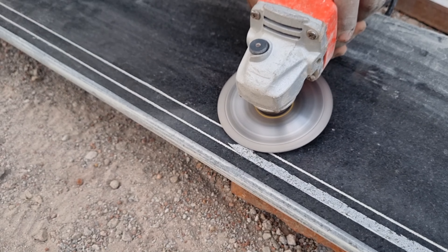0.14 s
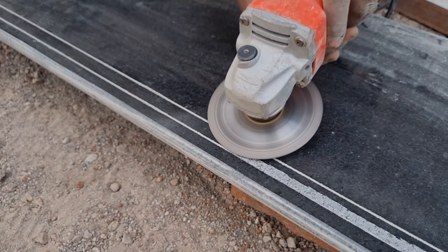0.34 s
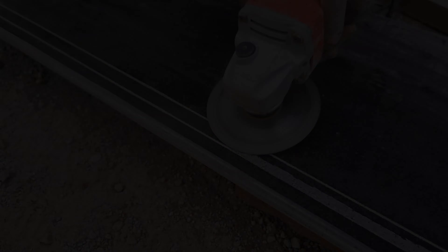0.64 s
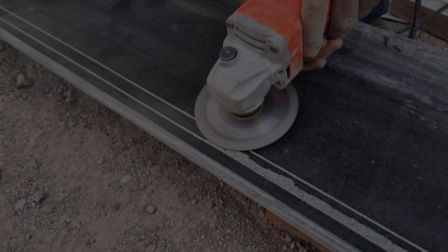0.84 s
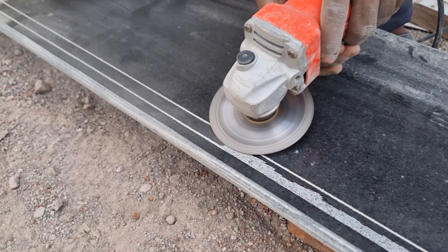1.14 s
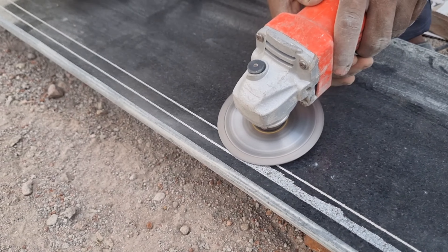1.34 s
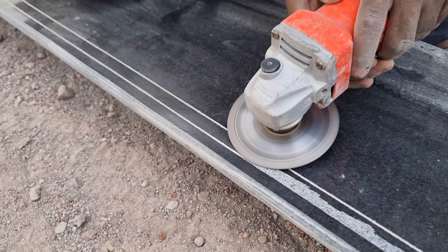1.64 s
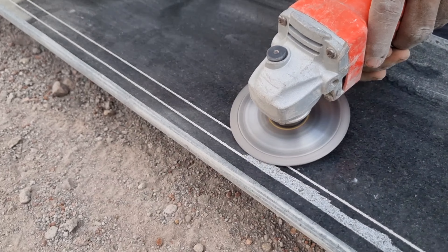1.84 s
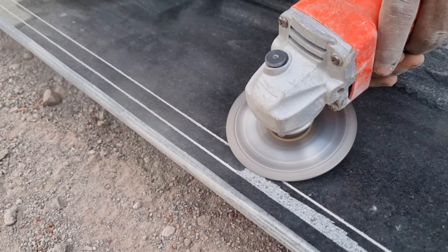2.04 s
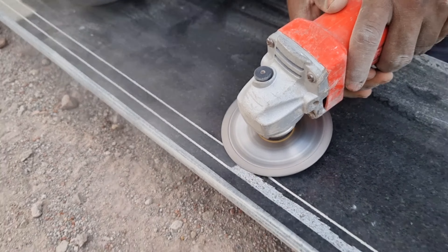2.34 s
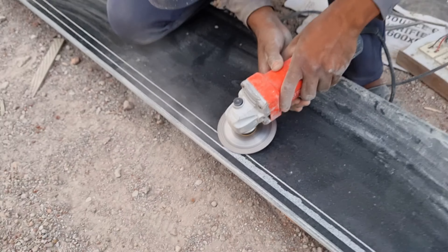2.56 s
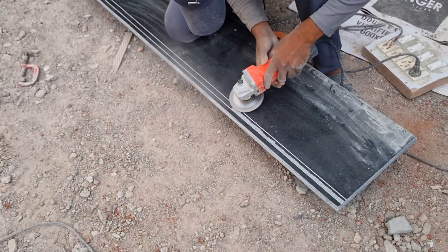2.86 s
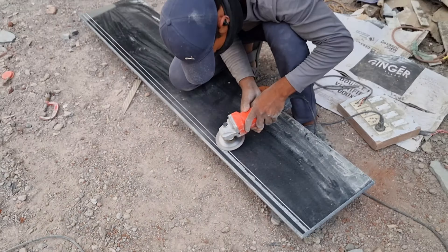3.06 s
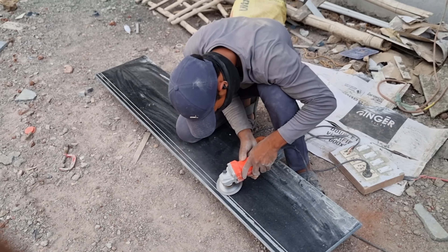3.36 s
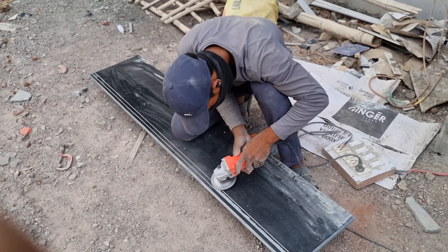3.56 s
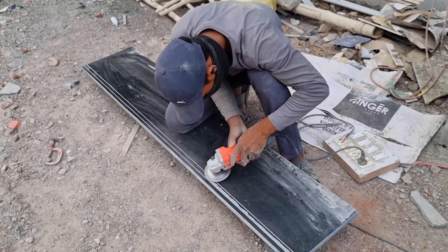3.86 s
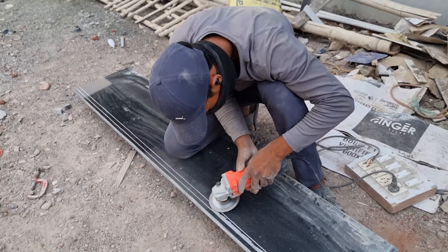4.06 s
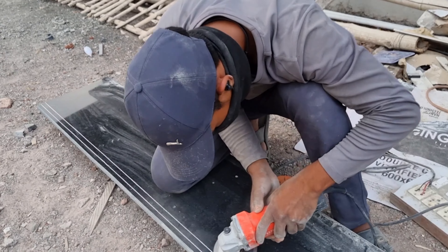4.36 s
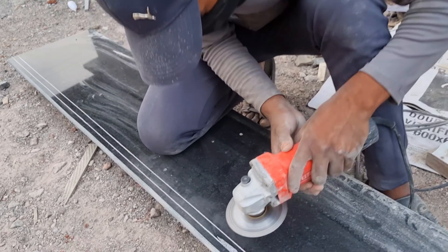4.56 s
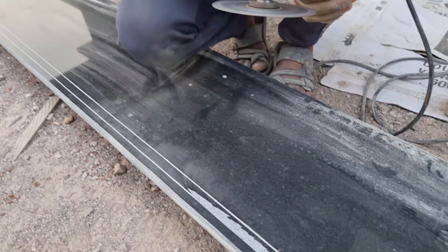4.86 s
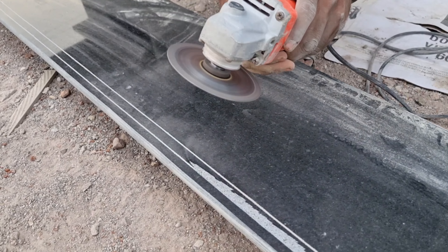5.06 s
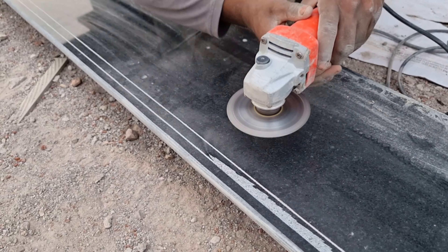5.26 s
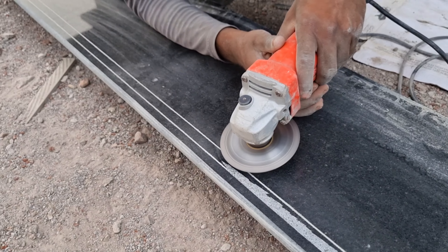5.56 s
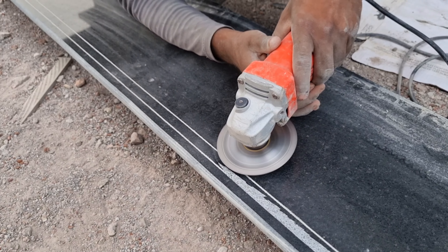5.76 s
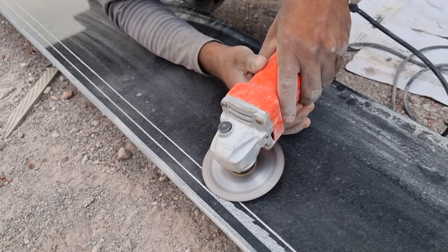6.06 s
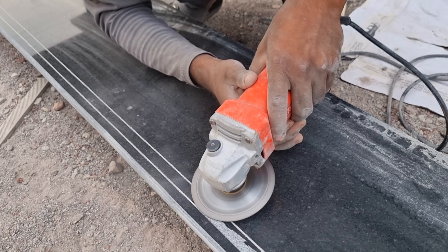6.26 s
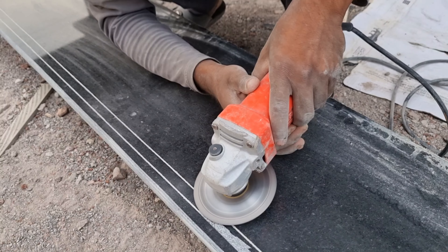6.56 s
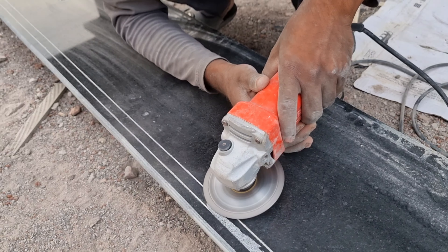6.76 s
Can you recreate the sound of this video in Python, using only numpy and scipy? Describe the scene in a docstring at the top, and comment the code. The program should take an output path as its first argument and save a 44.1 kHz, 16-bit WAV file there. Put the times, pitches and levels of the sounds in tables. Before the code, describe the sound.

Outdoors, an angle grinder's steel blade touches a granite slab a few times, then settles into a long, harsh, hissing grind with high metallic ringing and a buzzing hum. The close microphone backs away and returns. The tool lifts and spins slightly faster with an airy rush and thin whine, while wind thuds on the microphone, mostly on the left. Two short scrapes follow.

```python
"""Brief harsh scrapes ring out over a motor's rush and whine: an angle grinder touches a granite slab outdoors.
A long cut follows, grit exciting the stone's colour and the steel blade's modes, the rim knocking once a turn.
Lifted, the tool speeds up, bares its vents, then touches again; its tones follow the spindle, its rush is noise.
The microphone backs away and returns, bounces combing the sound; air rumbles and thuds, mostly at the left port."""
import sys
import numpy as np
from scipy import signal
from scipy.fft import rfft, irfft, next_fast_len
from scipy.io import wavfile

SR = 44100
rng = np.random.default_rng(int(sys.argv[2]) if len(sys.argv) > 2 else 0)


def digitize_waveform(pressure):
    """Quantize a signal to 16-bit integers and store it at the path in sys.argv[1].

    Rows of a 2-D input are taken as channels; values are limited to [-1, 1].
    """
    field = np.atleast_2d(pressure).T
    bounded = np.clip(field, -1, 1)
    quanta = np.round(bounded * 32767).astype(np.int16)
    wavfile.write(sys.argv[1], SR, quanta)


N = 304731

# Short touches of blade on stone: start t/s, length/s, scrape level/dB and singing level/dB before trim,
# dB by which both start lighter (negative: heavier)
TOUCHES = [(0, 0.12, -25.5, -25, -2), (0.177, 0.02, -24, -26, 2.5), (0.278, .29, -17, -18, 14.5),
           (4.289, 0.059, -31.5, -38, -0.5), (4.385, .03, -24, -34, 7), (6.033, 0.4, -22, -25, 3),
           (6.618, 0.21, -19, -22, 9.5)]
# Hand pressure in the long cut, as scrape level: t/s, level/dB before trim
PRESSURE = [(0.651, -25.5), (1.05, -22), (1.301, -25.5), (1.5, -21.5), (1.62, -24.5), (1.79, -20.5),
            (1.898, -25), (2.35, -22.5), (2.46, -25.5), (2.56, -23.5), (2.73, -27.5), (2.85, -27.5),
            (2.96, -25), (3.1, -21.5), (3.796, -18.5), (3.92, -22.5), (4.17, -25), (4.248, -30)]
# Singing mode pair in the long cut: t/s, level/dB before trim
SING = [(.65, -31), (1.03, -23.5), (1.3, -28), (1.78, -24), (1.93, -30), (2.25, -33), (2.42, -32),
        (2.57, -23.5), (2.75, -29), (3.1, -33), (3.37, -42), (3.6, -31), (3.87, -42), (4.06, -29),
        (4.25, -41)]
EDGE_S, LEAN_S = .025, 0.2   # fade as the blade meets or leaves the stone; time for the hand to lean in
# The spindle runs up when free and sags on the stone
FREE_TURNS_PER_S, LOADED_TURNS_PER_S, SPIN_LAG_S = 192.4, 182.9, .42
BITE_MOST_DB = 4.5   # hardest bite of the rim above its usual

# Colour of grit on stone: f/Hz, left level/dB, right level/dB (relative, per Hz)
SCRAPE = [(306, -70, -61), (1010, -3.5, -12.5), (1320, -3, -13), (2080, -4.5, -4), (3010, 11, 8.5),
          (4000, 5, -4), (4780, 0, 9), (5340, 1, -23), (6760, 7, 15.5), (7200, 3, 9), (8330, 8, 9),
          (9400, -1, -14), (11500, -15, -3), (12800, -1, -6), (14200, -11, -2), (15700, 6, -12)]
# Ringing modes of the steel blade: f/Hz, width/Hz, left level/dB, right level/dB (relative)
BLADE = [(4312, 45, -10, -11), (5110, 36, -9, -13), (6165, 50, -5.5, -8), (7010, 110, -9, -7),
         (7285, 40, -3, 0), (8300, 55, -22, -24), (10120, 65, -17, -9.5), (10825, 55, -13, -12),
         (11200, 42, -20, -19), (11900, 70, -16, -10), (12360, 50, -9, -7), (13020, 90, -17, -15),
         (13260, 90, -18, -12), (13620, 90, -25, -17), (13860, 110, -21, -9), (14590, 50, -15, -8),
         (15350, 200, -17, -12)]
# Close pair of modes that sings as the rim bites: f/Hz, width/Hz, left level/dB, right level/dB (relative)
SINGING = [(8745, 42, -10, -3), (8973, 34, -11, -1)]
# The contact point favours or damps one mode for a while: mode f/Hz, middle t/s, half length/s, change/dB
MODE_SWELLS = [(7285, 0.32, 0.39, 2), (8973, 0.33, 0.37, -9), (10120, 0.34, 0.64, 5), (10120, 6.4, .5, -5),
               (14590, 6.4, .5, -16), (7010, 7.6, .5, -4), (13260, 5.7, 0.37, 7), (7285, 3.86, 0.32, 2),
               (12360, 4.3, .5, -2), (4312, 1.7, 0.47, -8), (8973, 1.3, .5, 0.5), (8745, 1.8, 0.46, -10),
               (10825, 1.6, 0.82, 6), (5110, 1.98, 0.45, 4), (8745, 1.9, 0.12, 9), (8973, 2.6, 0.31, 1),
               (10120, 2.77, 0.23, 10.5), (12360, 2.1, 0.8, -9), (11900, 2.76, 0.31, -15),
               (5110, 3, 0.45, 5), (7010, 3.5, 0.37, 7), (5110, 3.75, 0.18, -20), (6160, 3.9, 0.15, 6),
               (10825, 6.2, 0.42, -7), (6160, 6.4, 0.27, -6), (5110, 6.04, 0.18, 3), (5110, 6.7, .14, 5),
               (8973, 6.1, 0.25, -17), (7285, 6.33, 0.35, 6)]
# Bouts of singing in the blade's low flexing mode: middle t/s, half length/s, level/dB
FLEXING = [(0.062, 0.1, -32), (0.315, 0.04, -37), (0.436, 0.045, -27), (3.378, 0.064, -38),
           (3.452, 0.028, -36), (3.597, 0.12, -41), (3.716, 0.025, -34.5), (3.822, 0.021, -41),
           (3.92, 0.04, -45), (4.195, 0.022, -44), (4.305, .03, -44), (6.113, 0.03, -37), (6.243, .06, -40),
           (6.36, 0.047, -33.5), (6.8, 0.052, -42)]
FLEX_HZ, FLEX_WIDTH_HZ = 1138, 26
FLEX_WAVER_DB, FLEX_SMEAR = 1.8, .7   # unsteadiness of level (dB) and phase (radians)
LIGHT_FLEX_DB = -47   # grit stirring the flexing mode, in the bouts and between them

# Bouts of the rim's high spot knocking: middle t/s, half length/s, hum level/dB, buzz level/dB before trim
KNOCKING = [(.085, 0.026, -41, -57), (0.506, 0.1, -41, -57), (0.824, 0.034, -39.5, -43),
            (0.972, 0.079, -37.5, -42), (1.218, 0.034, -34, -40), (1.306, 0.057, -37, -43),
            (1.497, 0.064, -35, -44), (1.594, 0.076, -40.5, -45), (1.833, 0.12, -37, -46),
            (2.106, 0.082, -36.5, -45), (2.395, 0.073, -35, -44), (2.733, 0.27, -41, -70),
            (3.256, 0.17, -39, -75), (3.618, 0.29, -45, -52), (6.049, 0.074, -62, -44),
            (6.8, 0.093, -64, -56)]
# Hum of the knocking: multiple of spindle speed, level/dB (relative)
HUM = [(3, -20), (4, 0)]
# Buzz above the hum: multiple of spindle speed, level/dB (relative)
BUZZ = [(5, 5), (6, -7), (7, 1), (9, -5), (10, -4), (11, -4), (13, -1), (15, 0), (16, -2), (18, -3),
        (21, -4)]
LIGHT_KNOCK_DB, LIGHT_BUZZ_DB = -50.5, -45   # resting levels at the nearest distance, buzz before trim
LIGHT_DB_PER_M = -41   # the resting knock fades with distance

# Cooling air as it reaches the microphone: t/s, level/dB before trim
FAN = [(0, -29.5), (2.3, -29), (3.0, -39), (4.45, -36.5), (4.68, -29), (4.83, -31.5), (5.05, -24.5),
       (5.5, -27), (5.98, -23.5), (6.4, -31.5), (6.91, -29.5)]
# Colour of fan and vents: f/Hz, left level/dB, right level/dB (relative, per Hz)
RUSH = [(265, -67, -9.5), (650, -2, 9), (806, 1.5, 0.5), (1430, -4.5, 14.5), (1880, -9, 9.5),
        (2660, 13.5, 22.5), (3550, 4.5, -2.5), (5390, 6.5, -10), (5600, 1.5, -32), (7180, 10.5, -7),
        (9080, -5.5, -7.5), (9300, -14, -1), (12900, -15.5, 2.5), (15000, -15, 0.5)]
# Air resonances of the motor housing: f/Hz, width/Hz, level/dB re the coloured rush
HOUSING = [(637, 210, -20), (1344, 85, -10.5), (1668, 30, -20), (2003, 38, -13.5), (2368, 82, -17),
           (2760, 16, -19.5), (3140, 17, -17.5)]
# Tones of motor and gear: multiple of spindle speed, level/dB re the FAN curve
GEAR = [(1, -30), (2, -32), (3, -25), (5, -30), (7, -21), (9, -25), (10, -26), (11, -23), (12, -25),
        (14, -22), (32, -23)]
# Commutator whine: multiple of spindle speed, level/dB re the FAN curve, before the vents' lift
WHINE = [(67.1, -20)]
# The whine stands out while the lifted tool shows its vents
VENTS_S, VENTS_HALF_S, VENTS_LEFT_DB, VENTS_RIGHT_DB = 4.98, .38, 10, 17
# Hollow note in the rush, sinking as the microphone comes close: t/s, f/Hz, level/dB before its flutter
HOLLOW = [(4.15, 700, -76), (4.4, 649, -49.5), (4.52, 624, -50), (4.65, 557, -53), (4.85, 547, -49),
          (5.2, 567, -66)]
HOLLOW_FLUTTER_HZ = 39   # sets its width

# Microphone distance from the blade: t/s, distance/m
DISTANCE = [(0, 0.3), (2.2, 0.36), (2.65, 0.43), (2.85, 0.6), (3.0, 0.59), (3.2, 1.2), (3.35, 1.64),
            (3.55, 1.91), (3.78, 1.9), (3.88, 1.54), (3.97, 1.22), (4.12, 0.75), (4.25, 0.68), (4.4, 0.4),
            (4.7, 0.42), (6.91, 0.23)]
# Direction of the tool: t/s, presence left minus right/dB, top left minus right/dB
BEARING = [(0, 0, 0), (.85, 5, -0.5), (1.6, 3, 2.5), (2.3, 5, 6), (2.55, 3, 9), (2.8, -3, -3.5),
           (3.4, -10.5, -6), (3.85, -9.5, 0), (4.08, -9, -9), (4.25, 3, -4), (4.7, 2.5, -9), (5.3, 5, -0.5),
           (6.91, 7, 1)]
# How alike the ports hear the tool: f/Hz, likeness 0-1, lead of the left port/radians
PORTS = [(100, 1, 0), (1000, .95, .15), (1450, .8, .3), (2250, .4, .9), (2750, .65, 2.5), (3150, .75, 3.1),
         (3500, .45, 4.1), (4100, .3, 7.5), (5100, .35, 11), (6200, .35, 12), (6600, .15, 16),
         (7200, .55, 17.5), (8300, .5, 19), (9000, .4, 21), (9600, .15, 21), (15300, .15, 25)]
LOW_ZONE_TO_HZ, TOP_ZONE_FROM_HZ = 3500, 9400   # presence lies between
# Zone level re presence: at the nearest distance (dB), and its change with distance (dB per m)
LOW_DB, LOW_DB_PER_M = -5.5, -4.5
TOP_DB, TOP_DB_PER_M = -1.5, -3
# The tool tilts and its top flares, mostly right: middle t/s, half length/s, right top/dB, right low zone/dB
FLARES = [(0.03, 0.1, 5.5, 3.5), (0.36, 0.12, 1.5, 4.5), (2.508, 0.099, 9, 5), (2.796, 0.2, 7, 7),
          (4.176, 0.062, 9.5, 6.5), (4.306, 0.033, 9.5, 1.5), (4.41, 0.013, 8, -2), (4.702, 0.19, 3.5, 1),
          (5.012, 0.15, 9.5, 3), (6.31, 0.11, 9, -9), (6.76, 0.19, 6.5, -1.5)]
FLARE_LEFT_SHARE = 0.19   # of a flare's dB
# Bounces off slab, its edge and ground: delay/ms at 1 m (shorter farther off), share at great distance
BOUNCES = [(0.423, 0.34), (0.636, -0.4), (.86, -0.093)]
BOUNCE_HALF_M, BOUNCE_DULL_HZ = 0.65, 8200   # nearer than this the direct sound drowns the bounces
# Echoes off the worker's arms and knees: delay/ms at the nearest, further ms per m backed off, share
RIPPLES = [(1.7, -.35, .2), (2.9, .5, -.2), (4.3, -.6, .18), (7.4, .9, .17)]
RIPPLE_PORT_MS = 0.097   # later at the right port
# Band cancelled by the ground bounce, climbing as the microphone backs away: t/s, f/Hz, share 0-1
CANCELLED = [(2.4, 700, 0), (2.7, 810, .75), (3.05, 980, .85), (3.25, 1450, .6), (3.55, 1520, .5),
             (3.85, 1950, .55), (4.0, 1300, .65), (4.15, 900, .75), (4.4, 850, .35), (4.6, 850, 0)]
CANCELLED_WIDTH_HZ = 430
# Dips and humps in the tone for a while: f/Hz, width/Hz, middle t/s, half length/s, left/dB, right/dB
DIPS = [(9400, 600, 2.0, 2.0, -8, 0), (9550, 800, 3.55, .4, -7, -14), (3450, 650, 3.55, .25, -3, -7),
        (2860, 260, 3.35, .35, 3, 3), (5580, 450, 3.52, .08, -8, -14), (5650, 450, 2.88, .07, -8, -10),
        (1950, 600, 4.13, .16, 6, 5), (2050, 700, 3.6, .2, 3, 5), (3750, 500, 2.68, .15, -6, -7),
        (3850, 600, 4.15, .2, -5, -6), (2860, 250, 6.3, .22, 4, 5), (480, 340, 2.85, .25, -11, -11),
        (480, 200, 1.6, .9, -3, -3)]
# Bands in opposite phase at the ports at some angles: f/Hz, width/Hz, middle t/s, half length/s, share 0-1
OPPOSED = [(3050, 750, 6.29, .15, .92), (3030, 550, 6.77, .17, .85), (3020, 250, 5.75, .35, .6),
           (3000, 500, 2.31, .06, .75), (3330, 350, 3.58, .22, .6)]

# Steady air across the ports: t/s, flow level/dB before eddies and trim
BREEZE = [(0, -58), (1.5, -50.5), (2.6, -49.5), (3.6, -40), (4.2, -40), (4.35, -52), (4.8, -54), (5.4, -39),
          (6.91, -36)]
# Gusts on top of it: start of hold t/s, hold/s, flow level/dB before eddies and trim
GUSTS = [(0.065, 0.013, -45), (0.17, 0.059, -46.5), (1.837, 0.03, -47), (2.764, 0.06, -40),
         (3.021, 0.082, -37), (3.635, 0.039, -35.5), (3.792, 0.019, -46), (4.083, 0.084, -41),
         (4.832, 0.3, -23), (5.137, 0.09, -29.5), (5.491, 0.051, -34.5), (5.89, .03, -27.5),
         (5.925, 0.056, -25), (6.025, 0.25, -32.5), (6.168, 0.078, -38.5), (6.428, 0.05, -33.5),
         (6.693, 0.06, -34.5), (6.815, 0.12, -36)]
GUST_ATTACK_S, GUST_RELEASE_S, EDDY_DB = 0.028, 0.023, 1.5   # rise, dying away, unevenness of the flow
# Single puffs on the port: t/s, peak level/dB before trim, length/s
PUFFS = [(1.85, -18, 0.0044), (1.864, -17, 0.009), (3.059, -21, 0.0067), (3.672, -25, 0.0062),
         (4.838, -4.5, 0.016), (4.894, -1.5, 0.017), (4.916, -4.5, 0.019), (5.026, -3.5, 0.016),
         (5.052, -4, 0.0097), (4.881, -6, 0.0059), (4.89, -12, 0.0092), (5.129, -8.5, 0.0029),
         (5.151, -9, 0.0025), (5.526, -16.5, 0.014), (5.915, -6.5, 0.019), (5.948, -8, 0.0082),
         (5.995, -9, 0.0075), (6.477, -17, 0.0077), (6.735, -16, 0.0054)]
RIGHT_PORT_DB = -20   # wind at the right port re the left
CUTOFF_HZ = 15750


def cutting(turns, contact, gains):
    """The rim bites once a turn and chatters; grit scrapes the stone and rings the blade."""
    scrape, sing = gains
    once_a_turn = .8 * np.cos(2 * np.pi * turns)
    chatter = 1.4 * drift(55) + 1.8 * drift(200)
    bite = from_db(np.minimum(once_a_turn + chatter, BITE_MOST_DB))
    # one stream shared by the ports, then one for each
    grains = np.array([grit(per_s=16000, spread_db=1.5) for _ in range(3)]) * bite
    rasp = each_turn(at_ports(grains[0], grains[1:]), turns, share=.55)
    stone = rms_one(colour(rasp, from_db(in_hz(SCRAPE))))
    blade = rms_one(steel(BLADE, grains, swell_db=1.35))
    hiss = from_db(2.5) * scrape * beamed(stone + from_db(5.5) * blade, flutter_db=0.97)
    singing = from_db(5.5) * sing * steel(SINGING, grains, swell_db=1.0)
    return hiss + singing + contact * flexing(grains[0])


def grit(per_s, spread_db):
    """Diamond grains strike the stone at random, a few harder than the rest."""
    hardness_db = spread_db * np.minimum(rng.exponential(1, N), 5)
    sizes = from_db(hardness_db) * rng.choice([-1, 1], N)
    strikes = rng.random(N) < per_s / SR
    return rms_one(sizes * strikes)


def steel(modes, grains, swell_db):
    """Grains ring the blade; the contact wanders over the mode shapes, so each mode swells on its own."""
    push = at_ports(grains[0], grains[1:]) + .4 * grains[0]
    out = 0
    for hz, width_hz, left_db, right_db in modes:
        favour_db = sum(db * swell(s, half_s) for mode_hz, s, half_s, db in MODE_SWELLS
                        if abs(mode_hz - hz) < 110)
        mode = ring(push * from_db(swell_db * drift(24.0)), hz, width_hz)
        out = out + mode * from_db([[left_db], [right_db]]) * from_db(favour_db)
    return out


def flexing(grains):
    """Grit stirs the blade's low mode; in bouts friction sustains it as a tone."""
    phase = 2 * np.pi * FLEX_HZ * np.arange(N) / SR + FLEX_SMEAR * drift(14)
    tone = np.sqrt(2) * np.sin(phase) * from_db(FLEX_WAVER_DB * drift(25))
    sustained = sum(from_db(db) * swell(s, half_s) for s, half_s, db in FLEXING)
    return sustained * tone + from_db(LIGHT_FLEX_DB) * ring(grains, FLEX_HZ, FLEX_WIDTH_HZ)


def strokes():
    """Contact with the stone (0-1) and the gains of scrape and singing, over the long cut and the touches."""
    t = np.arange(N) / SR
    long_cut_db = np.vstack([in_time(PRESSURE), in_time(SING)])
    spans = [(PRESSURE[0][0], PRESSURE[-1][0], long_cut_db)]
    for start, length, scrape_db, sing_db, lighter_db in TOUCHES:
        lean_db = lighter_db * np.exp(-np.abs(t - start) / LEAN_S)
        spans.append((start, start + length, np.array([[scrape_db], [sing_db]]) - lean_db))
    contact, gains = 0, 0
    for start, end, levels_db in spans:
        touching = np.clip(1 + np.minimum(t - start, end - t) / EDGE_S, 0, 1)
        contact = contact + touching
        gains = gains + touching * from_db(levels_db)
    return np.minimum(contact, 1), gains


def spindle(contact):
    """Turns made so far: the speed follows the load with a lag, more unevenly on the stone."""
    r = np.exp(-1 / (SPIN_LAG_S * SR))
    freed = signal.lfilter([1 - r], [1, -r], 1 - contact)
    speed = LOADED_TURNS_PER_S + (FREE_TURNS_PER_S - LOADED_TURNS_PER_S) * freed
    unevenness = (.0007 + .0045 * contact) * drift(9)
    return np.cumsum(speed * (1 + unevenness)) / SR


def each_turn(x, turns, share):
    """The same edges come round again, so the lower part of the noise partly repeats turn by turn."""
    n = np.arange(N)
    turn_ago = np.interp(turns - 1, turns, n)
    low = colour(x, 1 / (1 + (bins() / 4500) ** 4))
    for _ in range(2):   # the last two turns
        low = share * np.array([np.interp(turn_ago, n, side) for side in low])
        x = x + low
    return x


def knocking(turns, contact):
    """The rim's high spot knocks on the stone in bouts: spindle harmonics make a hum with a buzz above it."""
    fade_db = LIGHT_DB_PER_M * backed_off()
    hum = bouts([(s, half_s, db) for s, half_s, db, _ in KNOCKING], LIGHT_KNOCK_DB + fade_db)
    buzz = bouts([(s, half_s, db) for s, half_s, _, db in KNOCKING], LIGHT_BUZZ_DB + fade_db)
    humming = hum * orders(HUM, turns, waver_db=1.4, smear=.5)
    buzzing = buzz * orders(BUZZ, turns, waver_db=2.3, smear=.6)
    return contact * (humming + from_db(-9.0) * buzzing)


def bouts(rows, between_db):
    """A gain that rests at a low level and swells in bouts."""
    return from_db(between_db) + sum(from_db(db) * swell(s, half_s) for s, half_s, db in rows)


def orders(table, turns, waver_db, smear):
    """Tones locked to the spindle, each wavering in level (dB) and phase (radians)."""
    out = 0
    for multiple, db in table:
        level = np.sqrt(2) * from_db(db + waver_db * drift(20))
        out = out + level * np.sin(2 * np.pi * multiple * turns + smear * drift(30))
    return out


def motor(turns):
    """The fan rushes through vents and housing; gear and commutator whine."""
    white = rng.standard_normal((3, N))
    swirl = each_turn(at_ports(white[0], white[1:]), turns, share=.33)
    air = rms_one(colour(swirl, from_db(in_hz(RUSH))))
    housing = sum(from_db(db) * ring(rng.standard_normal(N), hz, width_hz) for hz, width_hz, db in HOUSING)
    rush = beamed(air + housing, flutter_db=1.0) * from_db(.5 * drift(72))
    facing = from_db(swell(VENTS_S, VENTS_HALF_S) * [[VENTS_LEFT_DB], [VENTS_RIGHT_DB]])
    gear = orders(GEAR, turns, waver_db=2.2, smear=.8)
    commutator = facing * orders(WHINE, turns, waver_db=1.8, smear=.4)
    return from_db(in_time(FAN)[0]) * (from_db(3.5) * rush + gear + commutator) + hollow_note()


def hollow_note():
    """A narrow, breathy resonance that glides: slow noise on two carriers a quarter turn apart."""
    hz, db = in_time(HOLLOW)
    phase = 2 * np.pi * np.cumsum(hz) / SR
    in_step = drift(HOLLOW_FLUTTER_HZ) * np.cos(phase)
    quarter_off = drift(HOLLOW_FLUTTER_HZ) * np.sin(phase)
    return from_db(db) * (in_step + quarter_off)


def beamed(x, flutter_db):
    """The way to the microphone: distance thins the low and top zones, and the top flares as the tool tilts."""
    x, away = dipped(cancelled(rippled(bounced(x)))), backed_off()
    flare_db, tilt_db = flares()
    low_db = LOW_DB + LOW_DB_PER_M * away + tilt_db
    top_db = TOP_DB + TOP_DB_PER_M * away + flare_db
    presence_pan, top_pan = in_time(BEARING)
    low = 1 / (1 + (bins() / LOW_ZONE_TO_HZ) ** 16)
    below_top = 1 / (1 + (bins() / TOP_ZONE_FROM_HZ) ** 16)
    zones = [(low, low_db, np.zeros(N)), (below_top - low, 0, presence_pan), (1 - below_top, top_db, top_pan)]
    out = 0
    for zone, level_db, pan in zones:
        sides = from_db(pan * [[.5], [-.5]])
        sides = sides / np.sqrt(np.mean(sides ** 2, axis=0))   # panning keeps the power
        out = out + rms_one(colour(x, zone)) * sides * from_db(level_db + flutter_db * drift(28))
    return out


def at_ports(common, own):
    """Two ports share the bass; the treble is mostly less alike and reaches the left one first."""
    alike, lead = in_hz(PORTS)
    alike = np.clip(alike, 0, 1)
    shared = colour(common, np.sqrt(alike) * np.exp(.5j * lead * [[1], [-1]]))
    return shared + colour(own, np.sqrt(1 - alike))


def backed_off():
    """Metres by which the microphone is farther away than at its nearest."""
    metres = in_time(DISTANCE)[0]
    return metres - metres.min()


def bounced(x):
    """Dull bounces comb the sound; the comb slides up as the microphone backs away."""
    n, metres = np.arange(N), in_time(DISTANCE)[0]
    strength = 1 / (1 + (BOUNCE_HALF_M / metres) ** 2)
    dull = colour(x, 1 / (1 + (bins() / BOUNCE_DULL_HZ) ** 4))
    for ms, share in BOUNCES:
        source = n - ms / metres * SR / 1000
        x = x + share * strength * np.array([np.interp(source, n, side) for side in dull])
    return x


def rippled(x):
    """Short, dull echoes carve fine strands into the noise; they slide as the microphone moves."""
    n, away = np.arange(N), backed_off()
    dull = colour(x, 1 / (1 + (bins() / 5500) ** 6))
    for ms, ms_per_m, share in RIPPLES:
        lag_ms = ms + ms_per_m * away
        echo = [np.interp(n - (lag_ms + port * RIPPLE_PORT_MS) * SR / 1000, n, side)
                for port, side in enumerate(dull)]
        x = x + share * np.array(echo)
    return x


def cancelled(x):
    """The ground bounce takes out a gliding band, found by shifting it to zero frequency and back."""
    hz, share = in_time(CANCELLED)
    phase = 2 * np.pi * np.cumsum(hz) / SR
    narrow = np.exp(-(2 * bins() / CANCELLED_WIDTH_HZ) ** 2)
    band = sum(2 * carrier * colour(x * carrier, narrow) for carrier in (np.cos(phase), np.sin(phase)))
    return x - np.clip(share, 0, 1) * band


def dipped(x):
    """Narrow bands of the tone sink or rise for a while."""
    for hz, width_hz, s, half_s, *depth_db in DIPS:
        change = from_db(np.outer(depth_db, swell(s, half_s))) - 1
        x = x + band_of(x, hz, width_hz) * change
    return x


def flares():
    """Lift of the top and of the low zone in dB, for each port."""
    lifts_db = sum(np.outer(change_db, swell(s, half_s)) for s, half_s, *change_db in FLARES)
    return lifts_db[:, None] * np.array([[FLARE_LEFT_SHARE], [1]])


def opposed(x):
    """What the ports share fades from a narrow band for a while, leaving it largely in opposite phase."""
    for hz, width_hz, s, half_s, share in OPPOSED:
        held = np.minimum(2 * swell(s, half_s), 1)
        x = x - share * held * band_of(x.mean(axis=0), hz, width_hz)
    return x


def wind(corner_hz, gust_corner_hz, right_db):
    """Eddies rumble on the ports; strong gusts shed smaller, brighter ones, and single puffs thud."""
    t, flow = np.arange(N) / SR, airflow()
    low_cut = 1 / np.sqrt(1 + (62 / bins()) ** 4)
    rumble_gain = low_cut / (1 + (bins() / corner_hz) ** 2.57)
    rumble = rms_one(colour(rng.standard_normal((2, N)), rumble_gain))
    flutter_gain = bins() / (bins() + 150) / (1 + (bins() / gust_corner_hz) ** 3)
    flutter = rms_one(colour(rng.standard_normal((2, N)), flutter_gain)) * from_db(1.7 * drift(42))
    gustiness = (flow / flow.max()) ** 0.73
    out = flow * (from_db(2.0) * rumble + from_db(-2.0) * flutter * gustiness)
    for s, peak_db, length_s in PUFFS:
        # one push and pull of pressure
        phase = (t - s) * 2 * np.pi / length_s
        out = out + from_db(peak_db - 3.5) * phase * np.exp(.5 - phase ** 2 / 2)
    return out * from_db([[0], [right_db]])


def airflow():
    """Strength of the air on the ports: a breeze, and gusts that rise, hold and die away."""
    t, flow = np.arange(N) / SR, from_db(in_time(BREEZE)[0])
    for start, hold_s, db in GUSTS:
        rise = np.clip(1 + (t - start) / GUST_ATTACK_S, 0, 1)
        dying = np.exp(-np.maximum(t - start - hold_s, 0) / GUST_RELEASE_S)
        flow = flow + from_db(db) * rise * dying
    return flow * from_db(EDDY_DB * drift(14.0))


def site():
    """Faint low rumble of the open yard: noise kept to the bass."""
    bass = bins() / (bins() + 60) / (1 + (bins() / 140) ** 2)
    return from_db(-56.0) * rms_one(colour(rng.standard_normal(N), bass))


def from_db(db):
    """Decibels to gain."""
    return 10 ** (np.asarray(db) / 20)


def rms_one(x):
    """Each channel scaled to rms 1."""
    return x / np.sqrt(np.mean(x ** 2, axis=-1, keepdims=True) + 1e-20)


def in_time(rows):
    """The columns of a curve at every sample."""
    s, *columns = np.transpose(rows)
    return np.array([np.interp(np.arange(N) / SR, s, c) for c in columns])


def bins():
    """Frequencies (Hz) of the spectrum of a whole signal, held to at least 1."""
    size = next_fast_len(N, real=True)
    return np.maximum(np.arange(size // 2 + 1) * SR / size, 1)


def in_hz(rows):
    """The columns of a spectrum at every frequency."""
    hz, *columns = np.transpose(rows)
    return np.array([np.interp(np.log(bins()), np.log(hz), c) for c in columns])


def colour(x, gain):
    """Filter by a gain for every frequency."""
    size = next_fast_len(N, real=True)
    return irfft(rfft(x, size) * gain, size)[..., :N]


def band_of(x, hz, width_hz):
    """One flat-topped band of x."""
    return colour(x, np.exp(-np.square((2 * (bins() - hz) / width_hz) ** 2)))


def drift(rate):
    """Smooth chance with spread 1, changing about rate times a second."""
    step = 40   # samples between draws
    r = np.exp(-2 * np.pi * step * rate / SR)
    slow = signal.lfilter([1], [1, -2 * r, r * r], rng.standard_normal(N // step + 2002))
    slow = slow[2000:]   # settled part
    return np.interp(np.arange(N) / step, np.arange(len(slow)), rms_one(slow))


def swell(middle_s, half_s):
    """A bell of height 1 in time."""
    return np.exp(-((np.arange(N) / SR - middle_s) / half_s) ** 2)


def ring(x, hz, width_hz):
    """One resonance driven by x; rms 1."""
    r = np.exp(-np.pi * width_hz / SR)
    return rms_one(signal.lfilter([1, 0, -1], [1, -2 * r * np.cos(2 * np.pi * hz / SR), r * r], x))


def scene():
    """Contact with the stone loads the spindle, whose turns drive motor and blade."""
    contact, gains = strokes()
    turns = spindle(contact)
    grinder = cutting(turns, contact, gains) + knocking(turns, contact) + motor(turns)
    return opposed(grinder) + wind(corner_hz=85, gust_corner_hz=350, right_db=RIGHT_PORT_DB) + site()


def record(dry):
    """Peaks stop at full scale, then the top is cut steeply."""
    return colour(np.clip(dry, -1, 1), 1 / np.sqrt(1 + (bins() / CUTOFF_HZ) ** 400))


dry = scene()
out = record(dry)
digitize_waveform(out)
```